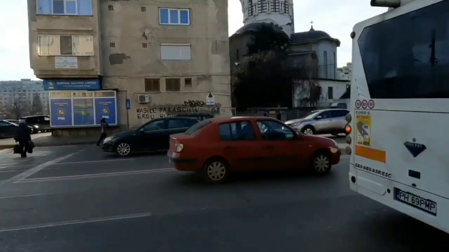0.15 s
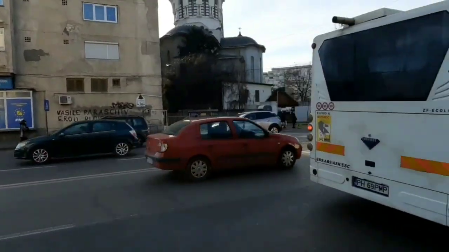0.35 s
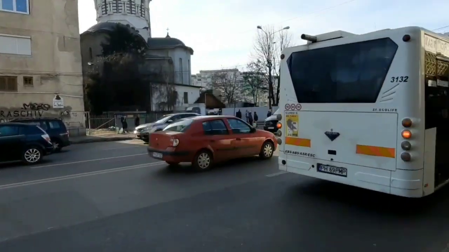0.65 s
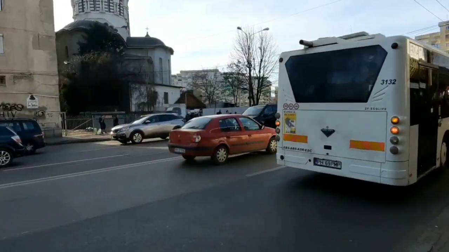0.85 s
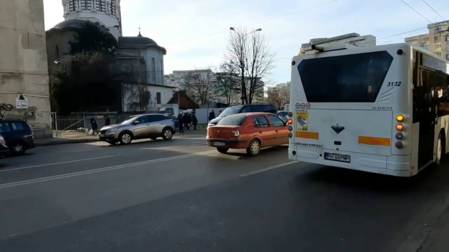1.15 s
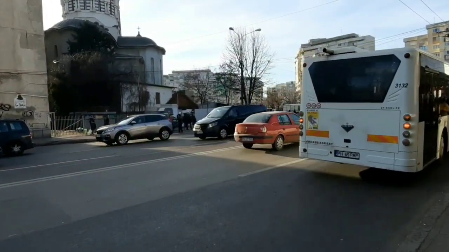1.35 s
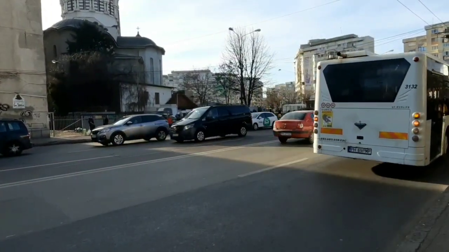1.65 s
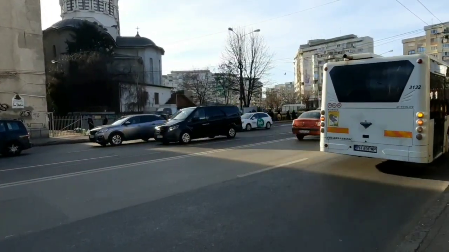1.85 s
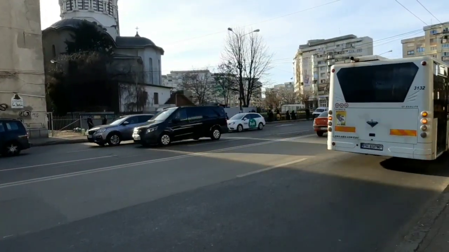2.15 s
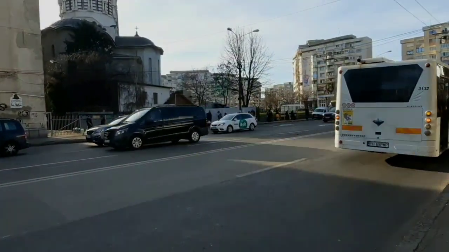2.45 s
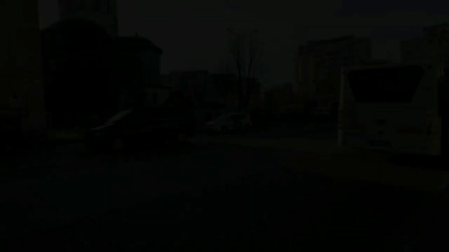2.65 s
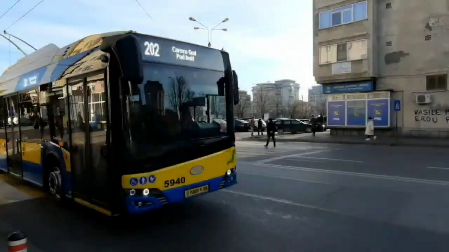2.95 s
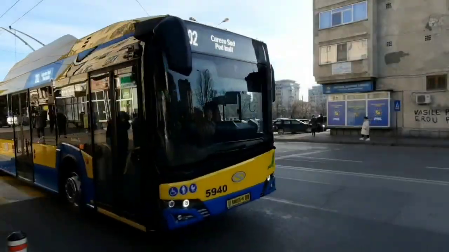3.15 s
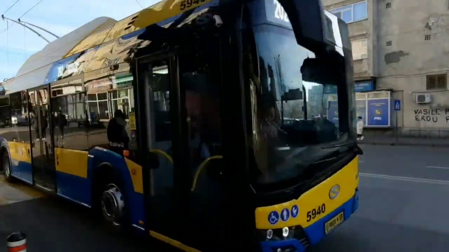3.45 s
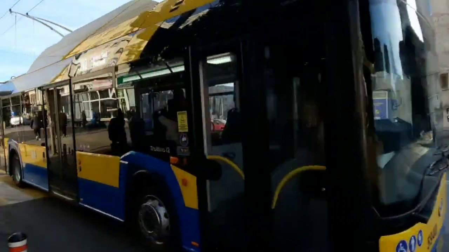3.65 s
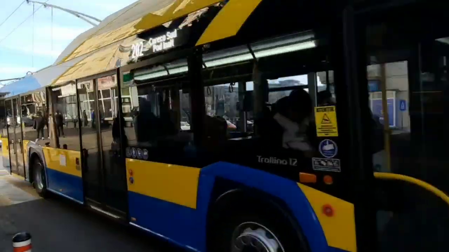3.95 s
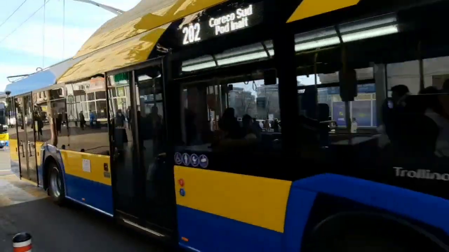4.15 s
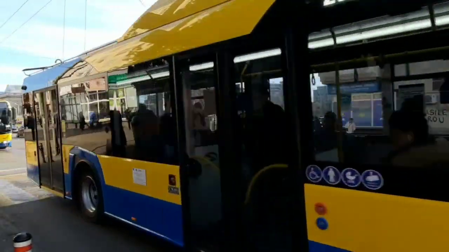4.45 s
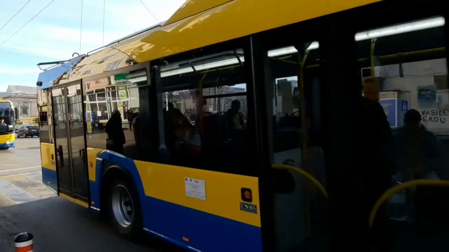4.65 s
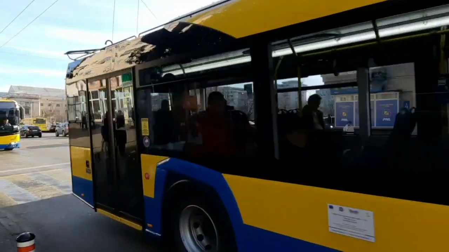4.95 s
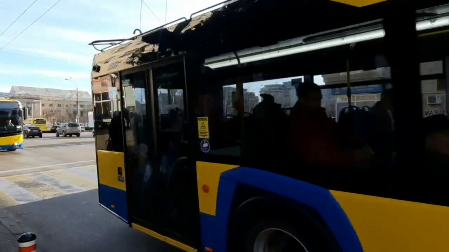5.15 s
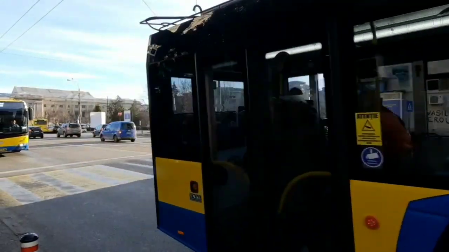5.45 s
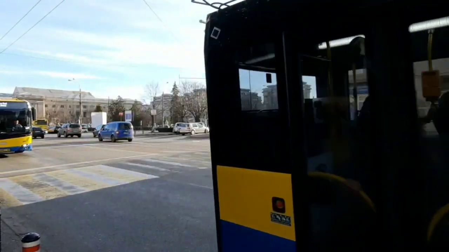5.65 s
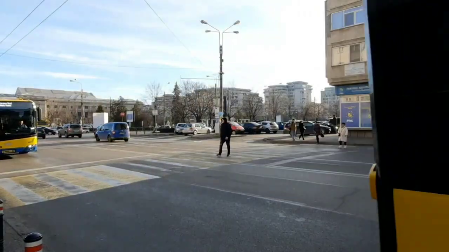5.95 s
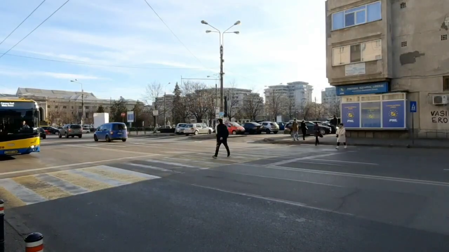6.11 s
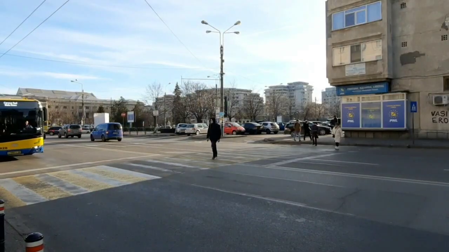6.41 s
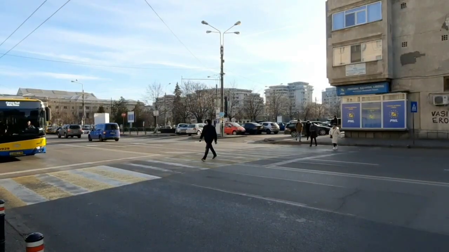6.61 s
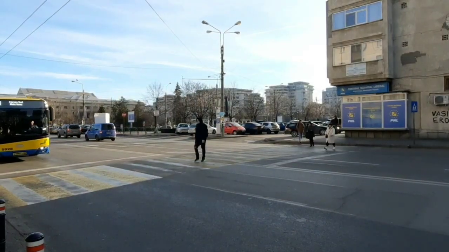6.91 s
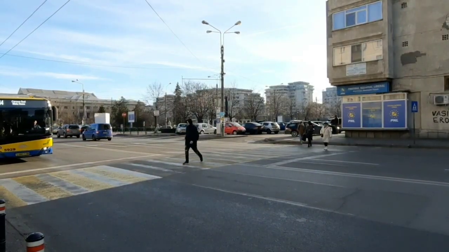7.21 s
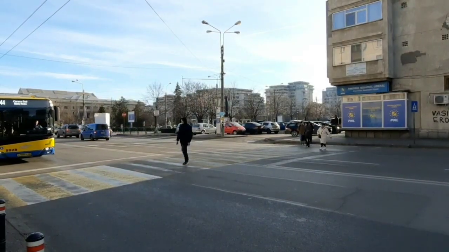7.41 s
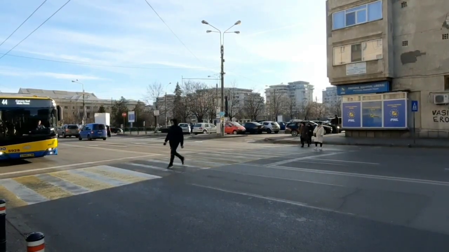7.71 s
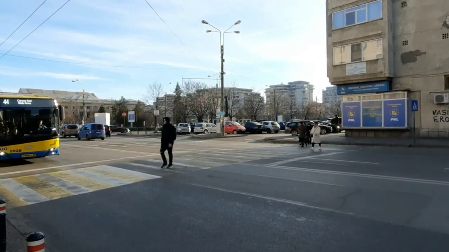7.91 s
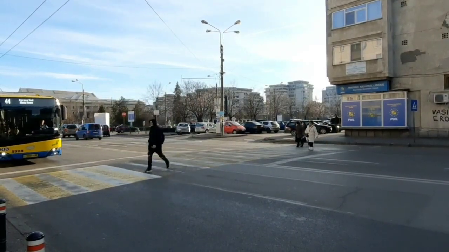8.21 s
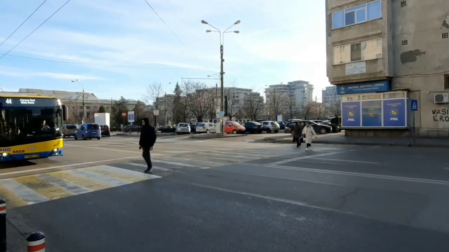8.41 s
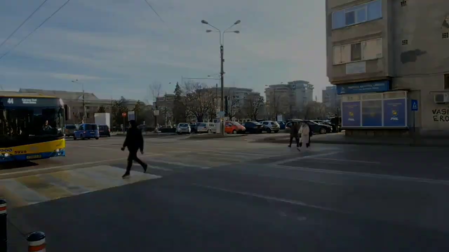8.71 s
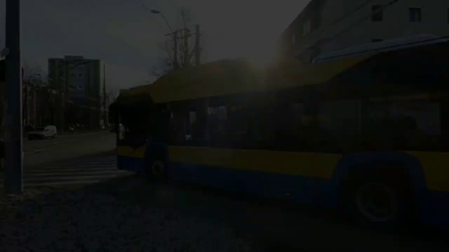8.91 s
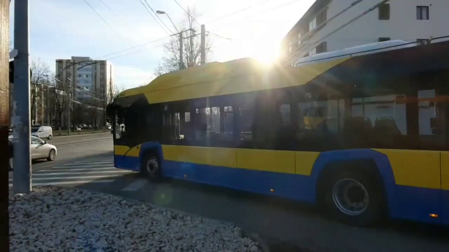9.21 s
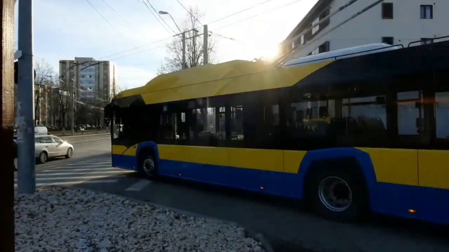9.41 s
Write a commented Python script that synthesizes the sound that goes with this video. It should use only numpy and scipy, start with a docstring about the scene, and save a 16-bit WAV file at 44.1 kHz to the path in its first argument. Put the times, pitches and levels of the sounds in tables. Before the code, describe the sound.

A diesel bus clatters away, then after a tiny gap a trolleybus rolls by with whine, sharp ticks and squealing brakes, and another engine revs.

```python
"""City crossing with buses

Three scenes with short silences between: a diesel bus pulls away clattering; a trolleybus glides past with
inverter whine, ticks and brake squeals while another engine revs up; a trolleybus turns off.
Layered noise makes the traffic roar, tone orders the engines, narrow-band noise the whines, squeals and
clatter, short ringing snaps the ticks; lumpy low noise is wind on a close pair of microphone ports."""
import sys
import numpy as np
from scipy import signal
from scipy.fft import rfft, irfft, next_fast_len
from scipy.io import wavfile
from scipy.ndimage import uniform_filter1d

SR = 44100
rng = np.random.default_rng(int(sys.argv[2]) if len(sys.argv) > 2 else 0)


def wav_out(sig):
    """Save sig, one row per channel (or a flat mono array), as 16-bit PCM at SR to the path in sys.argv[1]."""
    wavfile.write(sys.argv[1], SR, np.round(np.clip(np.atleast_2d(sig).T, -1, 1) * 32767).astype(np.int16))


N = 422037
TIME = np.arange(N) / SR
# scenes: start_s, end_s
SCENES = [(0, 2.7695), (2.8605, 8.9487), (9.0235, 9.6)]
SCREENED_S = 3.465   # the trolleybus body comes between the ports and the near traffic
SQUEAL_WOBBLE = 0.004   # pitch wander, share


def from_db(db):
    """Amplitude ratio of a level in dB."""
    return 10 ** (np.asarray(db) / 20)


def rms_one(x):
    """Scale to an RMS of 1."""
    return x / np.sqrt(np.mean(x ** 2) + 1e-20)


def power_sum(*levels_db):
    """Level of independent sources together: powers add."""
    return 10 * np.log10(sum(10 ** (np.asarray(db) / 10) for db in levels_db))


def column(values):
    """One row per layer, to broadcast over time."""
    return np.reshape(values, (-1, 1))


def in_time(rows, t=TIME):
    """Interpolate each column of a table over its first column, time."""
    s, *columns = np.transpose(rows)
    return [np.interp(t, s, c) for c in columns]


def at_hz(points, hz):
    """Interpolate (Hz, value) points over log frequency."""
    points_hz, values = np.transpose(points)
    return np.interp(np.log(hz), np.log(points_hz), values)


def panned(x, left_db):
    """Split the level difference, left over right, evenly between the ports."""
    return x * np.array([from_db(left_db / 2), from_db(-left_db / 2)]).reshape(2, -1)


def lagged(pair, lag_s):
    """The left port hears a near source a little later."""
    return np.array([np.interp(TIME - lag_s, TIME, pair[0]), pair[1]])


def drift(rate, size):
    """Slow chance: random points of spread 1, `rate` per second, joined by straight lines."""
    steps = np.arange(size) * rate / SR
    points = np.arange(int(steps[-1]) + 2)
    return np.interp(steps, points, rng.standard_normal(len(points)))


def lumps_of(rate, size):
    """Drift without its slow trend: quick lumps about a steady mean."""
    lumpy = drift(rate, size)
    return lumpy - uniform_filter1d(lumpy, size=SR // 3)


def narrow_noise(hz, width_hz, steady=0.):
    """Noise in a steep movable resonance: a carrier times low-passed complex noise plus a steady part."""
    low_pass = signal.butter(3, width_hz / 2, fs=SR, output="sos")
    run_in = int(4 * SR / width_hz)
    sway = signal.sosfilt(low_pass, rng.standard_normal((2, len(hz) + run_in)))[:, run_in:]
    sway = rms_one(sway) + [[steady], [0]]
    turn = 2 * np.pi * np.cumsum(hz) / SR
    return rms_one(sway[0] * np.cos(turn) + sway[1] * np.sin(turn))


def tone(start, end, hz, glide_hz, width_hz, first_db, last_db, flutter_db, wobble=0.):
    """A thin tone that swells in and out, glides and flutters; the narrower, the steadier."""
    out, on = np.zeros(N), slice(round(start * SR), round(end * SR))
    swell_s = np.clip(0.059 * (end - start), .005, .1)
    fade = np.clip(np.minimum(TIME[on] - start, end - TIME[on]) / swell_s, 0, 1)
    along = np.linspace(0, 1, len(fade))
    gain = from_db(first_db + (last_db - first_db) * along + flutter_db * drift(16, len(fade)))
    pitch_hz = (hz + glide_hz * along) * (1 + wobble * drift(10, len(fade)))
    out[on] = gain * fade * narrow_noise(pitch_hz, width_hz, steady=3.0 * np.exp(-width_hz / 30))
    return out


def shadowed(t):
    """Near 1 while the body stands before the street, falling to 0 as its tail clears."""
    cleared_s, clearing_s = 5.94, 0.47
    return (1 - np.tanh((t - cleared_s) / clearing_s)) / 2


# The *_levels functions give the dB of five roar layers:
# engine rumble, tyre roll, drive whirr, air hiss, thin top hiss.
def bus_levels(t):
    """The bus fades by inverse square of distance into the street."""
    start_m, speed_m_s = 3.24, 8.24
    # per layer: level_db, the bus at 0 s
    bus_db = [-28, -32, -31.5, -34.5, -58]
    # per layer: level_db, the street around it
    street_db = [-32.5, -37.5, -43.5, -51, -58]
    away_db = -10 * np.log10(1 + (speed_m_s * t / start_m) ** 2)
    return power_sum(column(bus_db) + away_db, column(street_db))


def passing_levels(t):
    """Near traffic is screened off, the trolleybus swells and fades, the far street stays."""
    # per layer, each from its own part of the body: nearest_s, level_db, half_power_after_s
    body_pass = [(5.34, -32.5, 1.04), (5.21, -39.5, 0.59), (5.6, -49.5, 2.6), (5.9, -45, 0.64),
                 (6.24, -49.5, 0.35)]
    # per layer: level_db, the far street
    far_db = [-41, -47.5, -50.5, -50.5, -59]
    # per layer: level_db, traffic close by until screened
    near_db = [-33, -48, -46, -51, -90]
    # per layer: change_db of the far street behind the body
    shadow_db = [-12, 0.5, 0.5, -9.5, -8]
    screening_s = 0.0335
    nearest_s, level_db, half_s = map(column, np.transpose(body_pass))
    body_db = level_db - 10 * np.log10(1 + ((t - nearest_s) / half_s) ** 2)
    screen_db = -10 * np.log10(1 + np.exp(np.minimum((t - SCREENED_S) / screening_s, 30)))
    street_db = column(far_db) + column(shadow_db) * shadowed(t)
    return power_sum(body_db, column(near_db) + screen_db, street_db)


def turning_levels(t):
    """The rumble grows and the layers above it fall as the trolleybus turns away."""
    # per layer: level_db at the start
    start_db = [-30.5, -38.5, -42, -50, -66]
    # per layer: slope_db_per_s
    slope_db_per_s = [7.5, -4.5, -4.5, -3.0, -8]
    return column(start_db) + column(slope_db_per_s) * (t - t[0])


def roar(span, levels, colour, top, side, lag_s, patchy_db):
    """Diffuse noise, five layers of three flickering bands; a shared part, left delayed by a positive lag_s."""
    # layer edges: edge_hz
    edges_hz = [20, 450, 1400, 3500, 9300, 16000]
    # coherence of the ports: frequency_hz, common_power_share
    likeness = [(40, 0.99), (110, 0.95), (300, 0.93), (800, 0.66), (2500, 0.33), (5000, 0.032),
                (12000, 0.07)]
    # per layer: surge_db, its swing as a whole
    surges_db = [1.9, 0.92, 0.46, .2, .2]
    first, last = round(span[0] * SR), min(round(span[1] * SR), N)
    length = last - first
    size = next_fast_len(length)
    hz = np.maximum(np.arange(size // 2 + 1) * SR / size, 1)
    common, left, right = rfft(rng.standard_normal((3, size)))
    alike = at_hz(likeness, hz)
    shift = np.exp(-2j * np.pi * hz * lag_s * hz / (hz + 300))   # the lows come from all sides at once
    pair = np.sqrt(alike) * common * [shift, shift ** 0] + np.sqrt(1 - alike) * np.array([left, right])
    is_top = hz > edges_hz[-2]
    colour_db = np.where(is_top, at_hz(top, hz), at_hz(colour, hz))
    pair = panned(pair, at_hz(side, hz)) * from_db(colour_db)
    out = np.zeros((2, N))
    for low, high, db, surge_db in zip(edges_hz, edges_hz[1:], levels(TIME[first:last]), surges_db):
        layer, surge = 0, surge_db * lumps_of(18, length)
        bands_hz = np.geomspace(low, high, num=4)
        own = is_top == (low == edges_hz[-2])
        for a, b in zip(bands_hz, bands_hz[1:]):
            share = own / np.sqrt((1 + (a / hz) ** 16) * (1 + (hz / b) ** 16))
            flicker = from_db(patchy_db * lumps_of(12, length) + surge)
            layer = layer + irfft(pair * share, size)[:, :length] * flicker
        out[:, first:last] += layer / np.std(layer.mean(axis=0)) * from_db(db)
    return out


def wind():
    """Lumpy low noise, mostly its own at each port: gusts over a wandering breeze, from scene two on."""
    # noise colour: frequency_hz, density_db_per_hz (relative)
    wind_colour = [(20, -37), (35, -13), (55, 0), (110, 2), (200, -9), (350, -12.5), (600, -44),
                   (1500, -72)]
    # gusts: peak_s, peak_db, left_over_right_db, fall_s (by 9 dB; held to 0.01-0.3 s below)
    gusts = [(2.92, -21, -2, 0), (3.145, -21.5, -11.5, 0.08), (3.28, -33, 0, -0.4), (3.41, -30, -12, -0.35),
             (3.5, -32, 1.5, 0.7), (3.695, -26, 4, -0.97), (3.785, -33.5, 1, 1), (4.33, -42, 4, 1.5),
             (5.0, -37.5, 0, 1.1), (5.41, -27, -2, .025), (5.72, -31, 3, -1), (6.02, -36.5, -4, 1.5),
             (6.79, -42, -3, 1.5), (7.12, -36.5, -2, .08), (7.52, -42, -5, -0.2), (7.71, -35.5, 1, .05),
             (8.4, -39, -2, 0.8), (9.11, -34, 9, .1), (9.29, -37.5, 7, 0.5), (9.47, -24, 3, 0)]
    breeze_db, breeze_swing_db, lee_db = -42.5, 4, -20
    shared = 0.39   # power share common to both ports
    rise_share = 0.38   # rise time over fall time
    size = next_fast_len(N)
    hz = np.maximum(np.arange(size // 2 + 1) * SR / size, 1)
    white = rng.standard_normal((3, size))
    ports = np.sqrt(1 - shared) * white[:2] + np.sqrt(shared) * white[2]
    noise = rms_one(irfft(rfft(ports) * from_db(at_hz(wind_colour, hz)), size)[:, :N])
    lumps = from_db(1.8 * np.array([drift(25, N), drift(25, N)]))
    swing_db = breeze_swing_db * np.array([lumps_of(13, N), lumps_of(12, N)])
    # the breeze drops in the lee of the body
    blow = from_db(breeze_db + lee_db * shadowed(TIME) * (TIME > SCREENED_S) + swing_db)
    for s, db, left_db, fall_s in gusts:
        age = (TIME - s) / np.clip(fall_s, .01, .3)
        blow = blow + panned(from_db(db) * np.exp(np.minimum(-age, age / rise_share)), left_db)
    return noise * lumps * blow * (TIME > SCENES[1][0])


def orders(hz, level_db, orders_db, waver_db):
    """Multiples of a firing rate, wavering in level, nearly in step so that each firing is a pulse."""
    # the exhaust lifts whichever order passes its resonance, with a dip below it
    peak_hz, peak_width_hz, peak_db = 268.6, 41, 9.5
    dip_hz, dip_width_hz, dip_db = 200, 14, -12
    pitch_wobble = 0.005   # speed wander, share
    out = 0
    turn = 2 * np.pi * np.cumsum(hz * (1 + pitch_wobble * drift(14, len(hz)))) / SR
    for k, db in enumerate(orders_db, start=1):
        lift_db = peak_db / (1 + ((k * hz - peak_hz) / (peak_width_hz / 2)) ** 2)
        lift_db += dip_db / (1 + ((k * hz - dip_hz) / (dip_width_hz / 2)) ** 2)
        gain = from_db(level_db + db + lift_db + waver_db * drift(12.85, len(hz)))
        out = out + np.sqrt(2) * gain * np.cos(k * turn + rng.normal(0, 0.48))
    return out


def engines():
    """Engines under load as firing orders, each sounding while its table lasts."""
    # per engine, rows of: time_s, firing_hz, level_db
    engine_runs = [
        [(0, 48.8, -31.5), (.15, 50.5, -31), (.3, 52.3, -30.5), (.45, 54.9, -36.5), (.6, 57.5, -38),
         (.78, 55.54, -41), (.85, 53.7, -58)],
        [(.7, 59.3, -61), (.95, 63.5, -40), (1.3, 67.75, -39.5), (1.7, 72.53, -33.5), (2, 75.96, -35.5),
         (2.3, 79.3, -34.5), (2.55, 81.3, -39)],
        [(5.85, 54.26, -62), (6.05, 57.63, -31.5), (6.25, 61.36, -43), (6.55, 61.2, -37.5), (6.7, 60.7, -46)],
        [(7.95, 52, -69), (8.16, 51.7, -39.5), (8.39, 54.4, -44), (8.594, 59.16, -35), (8.742, 62.4, -33.5),
         (8.906, 65.9, -31), (8.96, 68, -31)],
    ]
    # per engine: level_db of orders 1 to 6, relative
    engine_orders_db = [(-24, -4, -9, -10, -6, -4), (-14, -3.5, -24, -6, -27, -24),
                        (-7, -2, -11.5, -9, -12, -9), (-4.5, -5, 0.5, -4.5, -7.5, -14)]
    # per engine: waver_db, how unevenly it runs
    engine_wavers_db = [3.5, 2.2, 4, 3]
    out = np.zeros(N)
    for rows, orders_db, waver_db in zip(engine_runs, engine_orders_db, engine_wavers_db):
        on = (TIME >= rows[0][0]) & (TIME < rows[-1][0])
        out[on] += orders(*in_time(rows, TIME[on]), orders_db, waver_db)
    return panned(out, left_db=1.5)


def scrapes():
    """Short rough scrapes in the rolling noise: each lights one resonance at random, lower ones louder."""
    out = 0
    for when, pitch, length in rng.random((60, 3)):
        start = np.interp(when, [0, 1], [2.9, 7.6])
        hz = np.exp(np.interp(pitch, [0, 1], np.log([1000, 3200])))
        end = start + np.interp(length, [0, 1], [.04, .2])
        db = -55 - 4 * pitch
        out = out + tone(start, end, hz, -50, 160, db, db - 3, flutter_db=3.0)
    return out


def inverter():
    """A rough whine, fluttering in level and pitch, that grows as the motor nears and stops with the drive."""
    # time_s, pitch_hz, level_db
    inverter_whine = [(2.86, 4060, -64), (3.7, 4045, -59), (4.5, 4030, -53), (4.58, 4030, -59),
                      (4.9, 4025, -54), (5.06, 4015, -49), (5.2, 4005, -49), (5.26, 4005, -54),
                      (5.33, 4000, -50), (5.42, 4000, -56)]
    out = np.zeros(N)
    on = (TIME >= inverter_whine[0][0]) & (TIME < inverter_whine[-1][0])
    hz, db = in_time(inverter_whine, TIME[on])
    rough = narrow_noise(hz * (1 + .006 * drift(14, len(hz))), 80, steady=.7)
    out[on] = from_db(db + 1.8 * drift(20, len(hz))) * rough
    return out


def motor():
    """Sagging motor tone with a side tone below and above."""
    out, centre_hz, sag_hz = 0, 1196, -15
    for offset_hz, db in [(-120, -60), (0, -56.5), (141, -60)]:
        out = out + tone(5.35, 6.45, centre_hz + offset_hz, sag_hz, 4, db, db, flutter_db=2.5)
    return out


def squeals():
    """Squeals of brakes and collector shoes: gliding narrow noise, the broader the more wobbly."""
    # start_s, end_s, pitch_hz, glide_hz, width_hz, level_db
    squeal_rows = [(5.3, 7.3, 2300, -150, 300, -56), (5.42, 5.7, 2350, -20, 110, -51),
                   (5.78, 5.98, 2340, 30, 90, -50.5), (6.25, 6.52, 2170, 0, 180, -51.5),
                   (6.66, 6.77, 2050, 0, 200, -49.5), (5.4, 7.2, 4250, 0, 380, -52),
                   (5.44, 5.57, 4130, 30, 90, -48.5), (5.46, 5.53, 4520, 0, 30, -53),
                   (5.57, 5.67, 4520, -20, 30, -51), (5.63, 5.78, 4330, 0, 60, -51),
                   (5.74, 5.82, 4520, -10, 25, -49.5), (5.4, 6.2, 3990, -20, 90, -55),
                   (5.8, 6.15, 5600, 100, 700, -50), (5.92, 6.0, 4480, 0, 30, -51),
                   (6.18, 6.52, 6000, -250, 1000, -45.5), (6.44, 6.76, 5400, -300, 900, -47.5),
                   (6.65, 6.99, 6330, 50, 60, -55), (6.84, 7.05, 4250, 0, 260, -50),
                   (6.85, 7.0, 4460, -10, 70, -53), (7.0, 7.3, 6040, -10, 60, -56),
                   (7.05, 7.35, 4260, -20, 100, -56), (7.63, 7.77, 6000, -20, 40, -48),
                   (7.78, 7.84, 6000, 0, 25, -51), (7.77, 7.95, 5100, 0, 16, -51.5),
                   (7.95, 8.07, 5100, 0, 16, -48.5), (7.86, 8.1, 4975, 0, 25, -53),
                   (7.6, 8.8, 5650, 0, 300, -53), (7.975, 8.09, 6010, -90, 35, -47.5),
                   (8.15, 8.5, 4980, 0, 40, -57), (8.16, 8.27, 5104, 0, 16, -47),
                   (8.275, 8.36, 5104, 0, 16, -48.5), (8.385, 8.53, 5100, -5, 16, -47.5)]
    out = 0
    for start, end, hz, glide_hz, width_hz, db in squeal_rows:
        wobble = SQUEAL_WOBBLE * min(width_hz / 60, 2)
        out = out + tone(start, end, hz, glide_hz, width_hz, db, db, flutter_db=1.5, wobble=wobble)
    return out


def chirps():
    """Faint short squeaks at random, thickest in mid-span."""
    out, db = 0, -54
    for a, b, pitch, length in rng.random((30, 4)):
        start = np.interp((a + b) / 2, [0, 1], [5.45, 7.0])
        end = start + .07 * (.5 + length)
        hz = np.interp(pitch, [0, 1], [4100, 6600])
        out = out + tone(start, end, hz, -60, 40, db, db, flutter_db=2.5, wobble=SQUEAL_WOBBLE)
    return out


def shrieks():
    """A brake shrieks in short grains whose pitch falls as the wheel slows."""
    out, db, scatter_hz = 0, -52, 700
    for along, pitch, length in rng.random((36, 3)):
        start = np.interp(along, [0, 1], [6.17, 6.75])
        end = start + .045 * (.5 + length)
        hz = np.interp(along, [0, 1], [6200, 5200]) + scatter_hz * (2 * pitch - 1)
        out = out + tone(start, end, hz, -40, 60, db, db, flutter_db=2.5)
    return out


def ticks():
    """Metal on wire and chassis: a bright snap dropping in pitch, a faint broad rattle, ringing modes."""
    # start_s, peak_db, centre_hz, time_to_peak_s
    tick_rows = [(3.3693, -35, 5500, 0.0013), (3.6293, -30, 4160, .001), (4.0596, -32, 4400, 0.003),
                 (5.302, -23, 4410, 0.0019), (5.336, -20, 4830, 0.00096), (5.3432, -27, 6600, .001),
                 (5.3532, -24, 5310, 0.0006), (5.36, -31, 6000, .0008), (5.3785, -28, 4700, 0.0013),
                 (6.944, -30, 4390, 0.0017), (7.249, -35, 5000, .0008), (7.255, -28, 5200, .001),
                 (7.3467, -30, 4970, .001), (7.3552, -24.5, 5700, 0.00064), (7.9603, -23.5, 3660, 0.0011)]
    # modes of the struck metal, those near a tick's centre ringing most: mode_hz
    modes_hz = (1600, 3130, 4400, 4750, 5900)
    drop_share, snap_width_hz = 0.22, 2540
    rattle_share, rattle_s, ring_share, ring_s = 0.3, 0.018, 0.41, 0.013
    out, age = np.zeros(N), np.arange(1500) / SR
    for s, db, hz, peak_s in tick_rows:
        part = age / np.clip(peak_s, .0003, .004)
        onset = np.minimum(part, 1)
        snap_hz = hz * (1 + drop_share * np.clip(1.5 - part, -.6, 1.5))
        snap = narrow_noise(snap_hz, snap_width_hz, steady=1.1) * part * np.exp(1 - part)
        rattle = narrow_noise(np.full(len(age), hz), width_hz=5600) * onset * np.exp(-age / rattle_s)
        crack = snap + rattle_share * rattle
        for mode_hz in modes_hz:
            ring = narrow_noise(np.full(len(age), mode_hz), width_hz=220, steady=1)
            ring = ring / (1 + (2 * np.log(mode_hz / hz)) ** 2)
            crack = crack + ring_share * rng.uniform(0.42, 1) * ring * onset * np.exp(-age / ring_s)
        first = round(s * SR)
        out[first:first + len(age)] += from_db(db) * crack / np.abs(crack).max()
    return out


def clatter():
    """Each diesel knock is a sudden burst, with a weaker second blow, that rings the engine block."""
    # time_s, level_db, block_hz, low_panel_hz
    clatter_rows = [(0, -56, 2935, 746), (.4, -46, 2920, 730), (.55, -41, 2903, 732),
                    (.8, -41.5, 2684, 731), (1.05, -41, 2700, 718), (1.25, -43, 2730, 710),
                    (1.65, -43, 2871, 785), (2.15, -41.5, 2920, 775), (2.77, -43, 2937, 859)]
    # further block resonances: centre_hz, width_hz, level_db (relative), left_over_right_db
    block_modes = [(1985, 350, -6, 18), (4500, 870, -9, -11.5), (5690, 910, -12, -9.5), (3496, 690, -9, 4),
                   (12750, 900, -34.5, -2)]
    # multiples 1 to 10 of the knock rate: level_db, relative
    thrum_orders_db = [-16, -16, 4.5, 2.5, -3, 2, -6, -13.5, -10.5, -4.5]
    loaded_per_s, eased_per_s, easing_s = 33.2, 21.95, (.48, 1.61)
    start_turn, jitter_turns, detune_share = .627, .05, .016
    eased_ring, loaded_ring = .45, 1.4   # ring that lasts between knocks, over burst RMS
    thrum_db = -45

    per_s = np.interp(TIME[:round(SCENES[0][1] * SR)], easing_s, [loaded_per_s, eased_per_s])
    size = len(per_s)
    turns = start_turn + np.cumsum(per_s) / SR + jitter_turns * drift(20, size)
    knock, phase = turns.astype(int), turns % 1
    strength = from_db(2.0 * np.clip(rng.standard_normal((200, 2)), -2, 1.2))[knock]
    detune = 1 + detune_share * rng.standard_normal(200)[knock]
    burst = strength[:, 0] * np.exp(-phase / 0.22)
    burst = burst + .5 * strength[:, 1] * (phase > .27) * np.exp(-(phase - .27) / 0.089)
    burst = uniform_filter1d(burst, size=130)   # the pressure takes 3 ms to rise

    level_db, main_hz, panel_hz = in_time(clatter_rows, TIME[:size])
    main = from_db(1.5 * drift(22, size)) * narrow_noise(main_hz * detune, width_hz=270)
    panel = from_db(-4.5 + 6.1 * drift(8, size)) * narrow_noise(panel_hz, width_hz=55)
    body = panned(main, left_db=10.5) + panned(panel, left_db=-1.0)
    for hz, width_hz, db, left_db in block_modes:
        mode = from_db(db + 2.3 * drift(22, size)) * narrow_noise(hz * detune, width_hz)
        body = body + panned(mode, left_db)
    ring_on = np.interp(per_s, [eased_per_s, loaded_per_s], [eased_ring, loaded_ring])
    knocks = from_db(level_db) * (rms_one(burst) + ring_on) * body
    out = knocks + orders(per_s, thrum_db, thrum_orders_db, waver_db=3.5)
    return lagged(np.pad(out, ((0, 0), (0, N - size))), lag_s=0.00031)


def scene():
    """Three roars in turn, with wind, engines, clatter and the trolleybus sounds over them."""
    # colour of each roar: frequency_hz, density_db_per_hz (relative)
    bus_colour, passing_colour = [(18, -63), (30, -13), (46, -7.5), (65, 2), (177, -7), (290, 1.5),
                                  (462, -16), (755, -14), (1520, -15.5), (1920, -8), (2370, -7),
                                  (2860, -10.5), (3220, -14.5), (5770, -25), (8000, -27.5), (10400, -62.5),
                                  (17600, -120)], [(18, -42), (30, -16), (48, -9), (86, -5), (114, -3),
                                                      (209, -12), (303, -2.5), (451, -10), (720, -5),
                                                      (1420, -16.5), (2320, -24), (3700, -33.5),
                                                      (4160, -35), (6190, -35.5), (8000, -39), (10400, -54),
                                                      (17600, -120)]
    turning_colour = [(18, -37.5), (30, -10), (63, 6), (140, -11.5), (186, -21), (318, -3.5), (383, -16.5),
                      (431, -21), (570, -18.5), (2260, -16.5), (4260, -40.5), (6040, -38), (8000, -49.5),
                      (10400, -98), (17600, -120)]
    # colour of the top layer: frequency_hz, density_db_per_hz (relative)
    bus_top, trolley_top = [(9300, -37), (10600, -8), (11400, -2), (12800, 4), (14500, -7)], [(9300, 3), (10300, -4), (11500, -2), (13000, 0.5), (14500, -4)]
    # direction of each roar: frequency_hz, left_over_right_db
    bus_side, passing_side, turning_side = [(60, 1.5), (130, 1.0), (290, 2.8), (640, 2.7), (1400, 4.6),
                                            (3080, 5.9), (6770, 1), (14900, 5.4)], [(60, 0), (240, 0.5), (950, 1.2), (3750, -0.5),
                                                              (14900, 4)], [(60, 0), (180, -1),
                                                                                    (540, 2.5), (1640, 2),
                                                                                    (4940, -4), (14900, 9)]
    # per scene: left_lag_s (negative: left leads)
    lags_s = [0.00026, 0.00043, -0.00046]
    bus = roar(SCENES[0], bus_levels, bus_colour, bus_top, bus_side, lags_s[0], patchy_db=0.95)
    passing = roar(SCENES[1], passing_levels, passing_colour, trolley_top, passing_side, lags_s[1],
                   patchy_db=2.5)
    turning = roar(SCENES[2], turning_levels, turning_colour, bus_top, turning_side, lags_s[2],
                   patchy_db=3.0)
    near = scrapes() + inverter() + motor() + squeals() + chirps() + shrieks() + ticks()
    near = lagged(panned(near, left_db=0.), lag_s=.00005)
    return bus + passing + turning + wind() + engines() + near + clatter()


def record(dry):
    """Peaks are rounded, each scene fades in over 2 ms and cuts off hard; a dip near 9 kHz; the top is cut."""
    cutoff_hz = 14950
    rounded = .5 * np.tanh(dry / .5)
    gate = 0
    for start, end in SCENES:
        gate = gate + np.clip(np.minimum((TIME - start + .001) / .002, (end - TIME) / .0002), 0, 1)
    dip = signal.butter(1, [8500, 9900], "bandstop", fs=SR, output="sos")
    top_cut = signal.cheby2(24, 70, cutoff_hz, fs=SR, output="sos")
    return signal.sosfilt(top_cut, signal.sosfilt(dip, rounded * gate))


dry = scene()
out = record(dry)
wav_out(out)
```